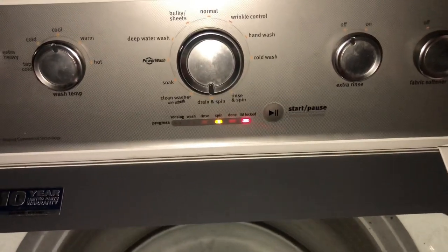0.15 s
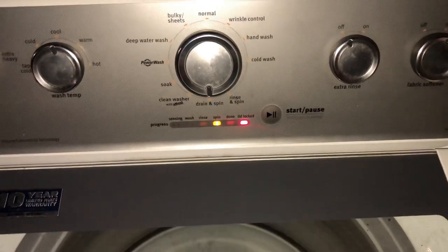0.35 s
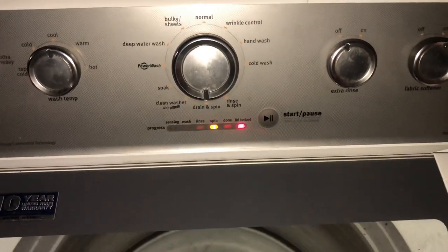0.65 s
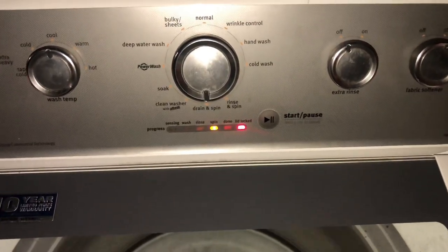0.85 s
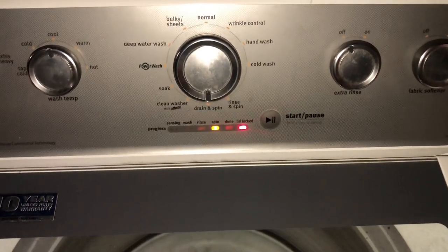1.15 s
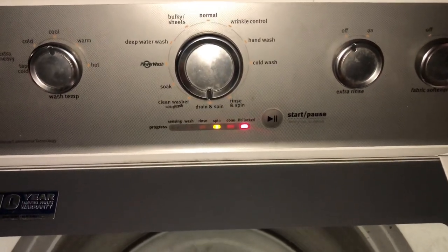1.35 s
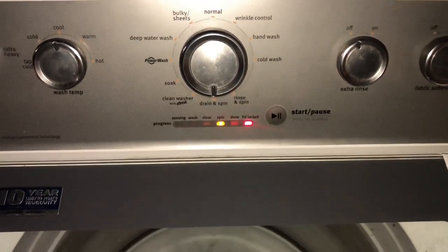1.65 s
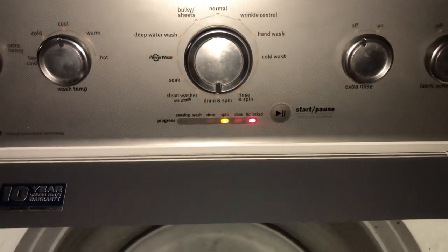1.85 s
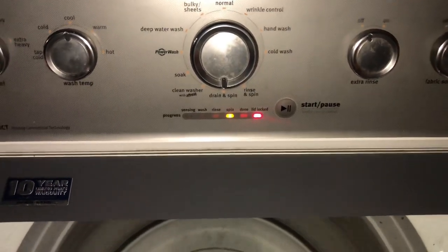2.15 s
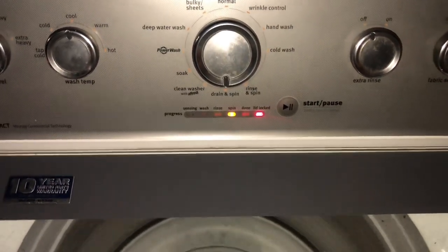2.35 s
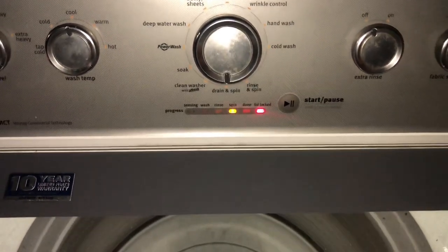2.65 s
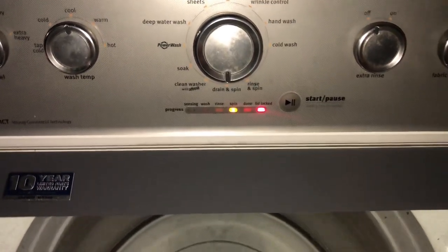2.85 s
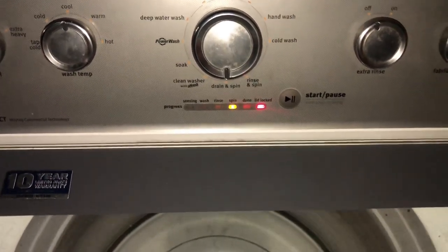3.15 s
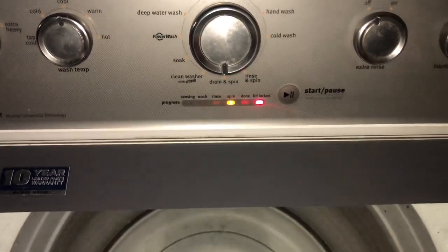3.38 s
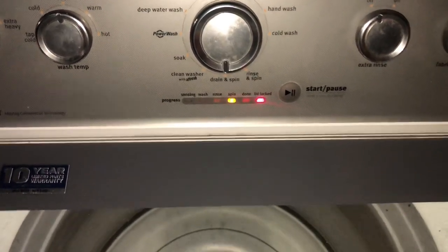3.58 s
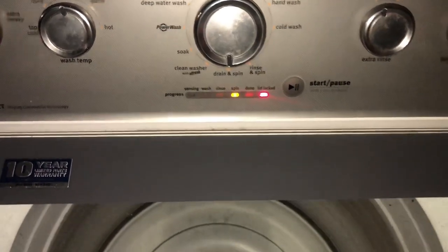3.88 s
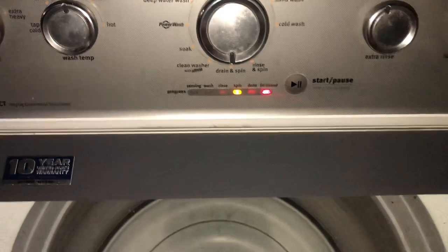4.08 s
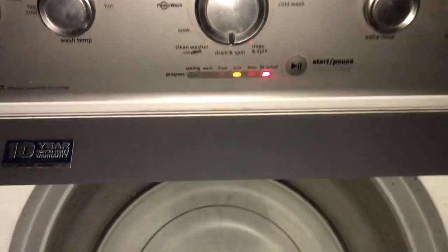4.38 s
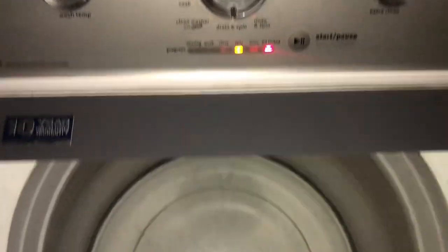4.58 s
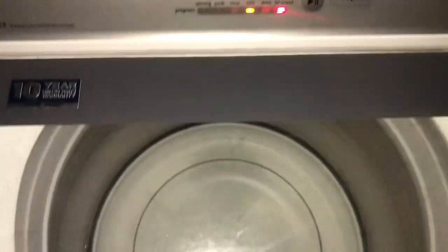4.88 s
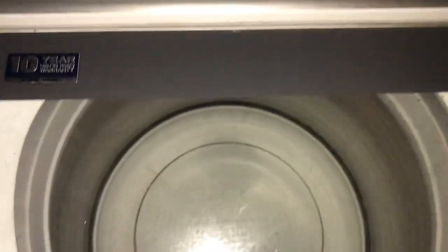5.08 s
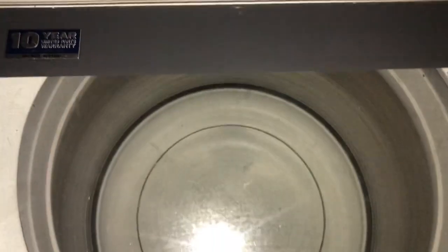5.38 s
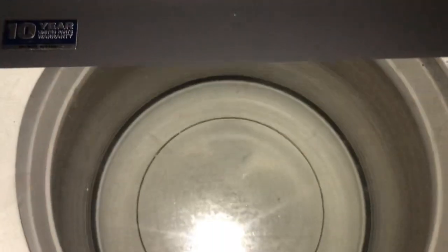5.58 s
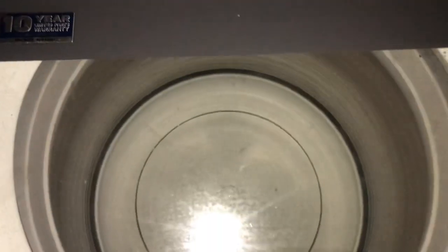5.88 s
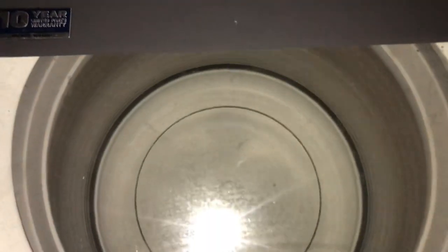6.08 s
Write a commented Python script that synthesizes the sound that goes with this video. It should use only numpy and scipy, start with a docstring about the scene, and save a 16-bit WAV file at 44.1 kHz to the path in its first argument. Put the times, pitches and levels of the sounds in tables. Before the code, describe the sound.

An empty top-load washer basket spins fast, motor humming and whining over a low roar while a metallic clack repeats about eight times a second.

```python
"""A top-load washing machine spins its empty basket at about eight turns a second, heard from above the open lid.
Mains hum and a rotor whine that follows the speed run throughout; the motor pulls hard for the first second,
with a thin sizzle. The tub drones in tones tied to the speed, and churned air roars and hisses. The basket
clacks once a turn and at first knocks on the far side too. The speed overshoots and settles; a few faint ticks
are heard. The far knock returns near 2.2 s, brushing joins from 2.75 s and wears off, faint knocks recur near 5.3 s."""
import sys
import numpy as np
from scipy.fft import rfft, irfft, next_fast_len
from scipy.io import wavfile
from scipy.ndimage import map_coordinates

SR = 44100
rng = np.random.default_rng(int(sys.argv[2]) if len(sys.argv) > 2 else 0)


def waveform_to_disk(signal):
    """Save audio, clipped to [-1, 1], as 16-bit WAV at the path in sys.argv[1]."""
    frames = np.transpose(np.atleast_2d(signal))
    scaled = np.clip(frames, -1, 1) * 32767
    samples = np.round(scaled).astype(np.int16)
    wavfile.write(sys.argv[1], SR, samples)


N = 274743
MAINS_HZ = 60


def amp(db):
    """Decibels to gain."""
    return 10 ** (np.asarray(db) / 20)


def unit(x):
    """x scaled to rms 1."""
    return x / np.sqrt(np.mean(x ** 2) + 1e-20)


def clock():
    """Time of each sample in seconds."""
    return np.arange(N) / SR


def curves(rows):
    """Each column after start_s, interpolated to one value per sample."""
    start_s, *columns = np.transpose(rows)
    return [np.interp(clock(), start_s, column) for column in columns]


def wobble(knots_per_s):
    """A smooth random curve through normally distributed knots."""
    knots = rng.standard_normal(int(N * knots_per_s / SR) + 4)
    return map_coordinates(knots, [clock() * knots_per_s])


def filtered(x, response):
    """x times a complex response of frequency, padded so that ringing does not wrap round."""
    size = next_fast_len(N + SR // 2)
    spectrum = rfft(x, size) * response(np.fft.rfftfreq(size, 1 / SR))
    return irfft(spectrum, size)[:N]


def colour(points):
    """Response through (pitch_hz, level_db) points on a log frequency axis."""
    pitch_hz, level_db = np.transpose(points)
    return lambda hz: amp(np.interp(np.log(hz + 1), np.log(pitch_hz), level_db))


def resonant(modes):
    """Causal response of parallel (pitch_hz, width_hz, level_db) resonances."""
    def response(hz):
        return sum(amp(level_db) * 1j * hz * width_hz / (pitch_hz * pitch_hz - hz * hz + 1j * hz * width_hz)
                   for pitch_hz, width_hz, level_db in modes)
    return response


def noise(response):
    """Noise of rms 1 with the given response."""
    return unit(filtered(rng.standard_normal(N), response))


def tone(cycles):
    """A sinusoid of rms 1 along a running count of cycles."""
    return np.sqrt(2) * np.cos(2 * np.pi * cycles)


SPIN_HZ, HUNT_HZ, HUNT_PERIOD_S, SETTLE_S, AT_SPEED_S = 8.3775, .484, 5.1, 1.3, .9315


def basket_speed():
    """Turns a second: swings past the set speed and settles like a damped spring."""
    t = clock()
    swing = np.sin(2 * np.pi * (t - AT_SPEED_S) / HUNT_PERIOD_S)
    return SPIN_HZ + HUNT_HZ * np.exp(-t / SETTLE_S) * swing


FIRST_CLACK_S = .0777


def basket_angle():
    """Turns of the basket: the integral of its speed, whole at the point that clacks."""
    turns = np.cumsum(basket_speed()) / SR
    return turns - np.interp(FIRST_CLACK_S, clock(), turns)


def passes(angle, turns):
    """Times in seconds at which the basket passes one point of its round."""
    first = turns + np.ceil(angle[0] - turns)
    return np.interp(np.arange(first, angle[-1]), angle, clock())


EASE_AT_S, EASE_S = 1, 0.21


def by_effort(settled, pulling):
    """Moves smoothly from pulling to settled as the motor eases off."""
    return settled + (pulling - settled) / (1 + np.exp((clock() - EASE_AT_S) / EASE_S))


# Strong hum: start_s, level_120hz_db, level_240hz_db, level_360hz_db
HUM_LEVELS = [(0, -40.5, -37.5, -35.5), (0.55, -39, -34, -44), (1.0, -40, -43.5, -35),
              (1.45, -39.5, -37.5, -38), (2.1, -39.5, -37, -46), (2.6, -40.3, -38, -43.5),
              (3.4, -41, -37, -43.5), (4.1, -42, -40, -40.5), (5.1, -40, -38, -37.5),
              (5.5, -40, -40, -37.5), (6.2, -40, -37, -39.5)]
# Throb of each strong hum tone: settled_db, pull_db, lag_turns, side (+1 beats from above, -1 from below)
HUM_THROB = [(-59, -42, 0.013, 1), (-51.5, -48, 0.67, -1), (-52, -58, 0.12, -1)]
# Weaker hum tones: mains_multiple, level_db
WEAK_HUM = [(3, -59), (8, -53.5), (10, -52.5), (12, -52), (14, -53), (16, -67), (18, -89)]
SLIP_HZ = .09  # the tub's swing slowly falls behind the basket


def motor(angle):
    """Magnetic hum, mostly at even mains multiples; its strong tones throb as the basket swings round."""
    mains = MAINS_HZ * clock()
    swing = angle - SLIP_HZ * clock()
    out = np.zeros(N)
    for k, (level_db, throb_row) in enumerate(zip(curves(HUM_LEVELS), HUM_THROB), 1):
        settled_db, pull_db, lag_turns, side = throb_row
        delay_cycles = .05 * k * k  # the bending panels pass each tone with its own delay
        cycles = 2 * k * mains - delay_cycles + 0.018 * wobble(4.94)
        # the basket's share is shifted by one cycle per turn of the swing and beats with the rest
        throb = amp(by_effort(settled_db, pull_db)) * tone(cycles + np.sign(side) * (swing - lag_turns))
        steady = amp(level_db + 0.37 * wobble(5.1)) * tone(cycles)
        out -= steady + throb
    for mains_multiple, level_db in WEAK_HUM:
        gain = amp(level_db + wobble(1.76))
        out -= gain * tone(mains_multiple * mains + rng.random() + 0.12 * wobble(1.334))
    return out


# Whine lines either side of the slot rate: mains_multiple_added, level_db (relative)
WHINE_SIDEBANDS = [(-2, 2), (0, 2), (2, -1.5), (4, -2), (6, -9)]
# Cabinet resonances: pitch_hz, width_hz, level_db (relative)
CABINET_MODES = [(519, 5.2, 4), (624, 8.8, -11), (627, 13, -1.5), (870, 33, 2), (980, 8.3, 0)]
SLOTS_PER_TURN = 77  # rotor slot cycles per basket turn
WHINE_DB, WHINE_PULL_DB = -53, -47


def whine():
    """Rotor slots sing in lines that follow the speed and swell as they cross cabinet resonances."""
    slot_hz = SLOTS_PER_TURN * basket_speed()
    whine_db = by_effort(WHINE_DB, WHINE_PULL_DB)
    out = np.zeros(N)
    for mains_multiple, level_db in WHINE_SIDEBANDS:
        line_hz = slot_hz + mains_multiple * MAINS_HZ
        cabinet_gain = 0.29 + 0.72 * np.abs(resonant(CABINET_MODES)(line_hz))
        gain = amp(whine_db + level_db + wobble(4.5)) * cabinet_gain
        out += gain * tone(np.cumsum(line_hz) / SR + rng.random() + 0.036 * wobble(12))
    return out


# Drone levels: start_s, sway_db, walls_db
DRONE_LEVELS = [(0, -55, -50), (.8, -47, -58), (1.25, -57, -55), (1.75, -57, -55), (2.1, -46.5, -55),
                (2.6, -52, -51), (3.2, -46, -47), (4.2, -50.5, -48.5), (6.2, -55, -51)]
# Deep sway of the tub: cycles_per_turn, level_db (relative)
SWAY_ORDERS = [(4.9, -26), (6.88, -6), (7.9, -10), (8.85, -4)]
# Higher drumming of the tub walls: cycles_per_turn, level_db (relative)
WALL_ORDERS = [(9.9, -12), (10.8, -8.5), (16.3, -5.5), (18.7, -12), (20.7, -5.5), (22.7, -13)]


def tub(angle):
    """The drive shakes the tub in low, unsteady tones that follow the speed."""
    out = np.zeros(N)
    for drone_db, orders in zip(curves(DRONE_LEVELS), (SWAY_ORDERS, WALL_ORDERS)):
        for cycles_per_turn, level_db in orders:
            waver_db = 1.2 * wobble(1.6)
            drift_cycles = .08 * wobble(2)
            cycles = cycles_per_turn * angle + rng.random() + drift_cycles
            out += amp(drone_db + level_db + waver_db) * tone(cycles)
    return out


# Level of the roar: start_s, level_db
ROAR_LEVELS = [(0, -41.5), (1.05, -39.5), (2.3, -42.5), (4, -41), (5.2, -40.5), (6.2, -41)]
# Spectrum of the low roar: pitch_hz, level_db (per Hz, relative)
ROAR_COLOUR = [(25, -30), (48, -13.5), (70, -16), (100, -5), (135, -1.5), (180, -5.5), (225, 3), (320, 0.5),
               (420, -4), (600, -4), (780, -10), (1050, -12.5), (1400, -18.5), (2600, -58.5)]
# Spectrum of the hiss: pitch_hz, level_db (per Hz, relative)
HISS_COLOUR = [(800, -40), (1400, 9), (2000, 10.5), (2400, 4), (2850, -5), (3400, -2.5), (4500, -5.5),
               (6000, -6), (8300, -10), (11000, -15.5), (13000, -18), (15500, -22)]
HISS_DB = -57


def air():
    """The spinning basket churns air and rumbles through the cabinet; a fine hiss lies on top."""
    roar_db, = curves(ROAR_LEVELS)
    roar = noise(colour(ROAR_COLOUR)) + amp(-11.5) * noise(resonant(CABINET_MODES))
    roar *= amp(roar_db + 0.17 * wobble(22.5))
    hiss_level_db = HISS_DB + .9 * wobble(40)
    hiss = amp(hiss_level_db) * noise(colour(HISS_COLOUR))
    return roar + hiss


SIZZLE_DB = -73


def sizzle():
    """A narrow band of friction noise that fades as the motor eases off."""
    ring = resonant([(7200, 650, 0)])
    gain = by_effort(0, amp(SIZZLE_DB)) * amp(1.6 * wobble(28.5))
    return gain * noise(lambda hz: ring(hz) ** 2)


def burst(start_s, t60_s, attack_s=0.0012):
    """An envelope that rises at start_s and decays by 60 dB in t60_s."""
    t = np.arange(SR // 4) / SR
    shape = (1 - np.exp(-t / attack_s)) * amp(-60 * t / t60_s)
    return np.pad(shape, (max(round(start_s * SR), 0), N))[:N]


def chatter(count):
    """Random signs: a dense, flat excitation."""
    return np.sign(rng.standard_normal(count))


# Basket modes: pitch_hz, width_hz, level_db (relative)
BASKET_MODES = [(1856, 96, 8), (2186, 220, 3.5), (2440, 60, 2.5), (2726, 47, -3), (3156, 250, -2),
                (3387, 59, -0.5), (3780, 110, -4), (4140, 160, -4.5), (4730, 130, -10.5), (5640, 1400, -10),
                (6760, 280, -8), (7290, 330, -8), (8060, 780, -3.5), (9000, 590, -12.5), (10000, 820, -15),
                (12700, 1600, -10)]


def rattle(starts_s, levels_db, contact, t60_s, crack_db=-1, crack_t60_s=0.0078):
    """A short crack, then the basket's dense modes answer, partly alike from strike to strike, and the tub rings."""
    t = np.arange(SR // 6) / SR
    crack = amp(crack_db - 60 * t / crack_t60_s)
    basket_ring = amp(-60 * t / t60_s)
    tub_ring = amp(-17.5) * amp(-60 * t / 0.39)
    envelope = (1 - np.exp(-t / 0.0012)) * (crack + basket_ring + tub_ring)
    common = chatter(len(t))
    out = np.zeros(N + SR)
    for start_s, level_db in zip(starts_s, levels_db):
        scatter = .9 * chatter(len(t))  # drawn afresh for each contact
        first = max(round(start_s * SR), 0)
        out[first:first + len(t)] += amp(level_db) * envelope * (common + scatter)

    def body(hz):
        return resonant(BASKET_MODES)(hz) * colour(contact)(hz)
    return filtered(out[:N], body) / np.std(filtered(chatter(N), body))


# Force of the clack: start_s, level_db
CLACK_LEVELS = [(0, -53.5), (1.6, -52), (1.9, -50), (2.3, -51), (2.7, -52), (4.8, -52), (6.2, -52)]
# Spectrum of the clack contact: pitch_hz, level_db (relative)
CLACK_CONTACT = [(900, -6), (1800, 0.5), (2300, 2), (3100, 5.5), (4300, 2.5), (6000, -2), (8300, 0),
                 (11000, -11), (16000, -17)]
# Force of the far-side knock: start_s, level_db
FAR_KNOCK_LEVELS = [(0, -47.5), (.9, -49), (1.15, -56), (2.06, -57), (2.18, -49), (2.43, -52), (3, -64),
                    (5.05, -71), (5.33, -57), (6.2, -70)]
# Spectrum of the knock contact: pitch_hz, level_db (relative)
KNOCK_CONTACT = [(900, -11), (1850, 8), (2800, 3), (4200, 8.5), (6000, 9), (8300, -6.5), (11000, -8),
                 (16000, -21)]
CLACK_SCATTER_DB = 0.63
SNAP_DB, SNAP_PULL_DB = -22, -7  # relative to the clack
FAR_SIDE_TURNS = .587
# brushing leads each clack; level relative to the clack
BRUSH_FROM_S, BRUSH_LEAD_S, BRUSH_DB, BRUSH_FADE_DB_PER_S = 2.75, .009, -2, 5.5


def strikes(angle):
    """Each turn the basket clacks with a crisp snap, later brushing first, and knocks past half a turn on."""
    clack_s = passes(angle, 0)
    clack_db = np.interp(clack_s, *np.transpose(CLACK_LEVELS))
    clack_db += CLACK_SCATTER_DB * rng.standard_normal(len(clack_s))
    clacks = rattle(clack_s, clack_db, CLACK_CONTACT, t60_s=0.092)

    snaps = sum(amp(level_db) * burst(start_s, t60_s=0.065) for start_s, level_db in zip(clack_s, clack_db))
    snaps = snaps * amp(by_effort(SNAP_DB, SNAP_PULL_DB))
    contact = resonant([(11000, 7200, 0)])  # the contact itself is bright and has no pitch
    snaps = snaps * noise(lambda hz: contact(hz) ** 2)

    far_s = passes(angle, FAR_SIDE_TURNS)
    far_db = np.interp(far_s, *np.transpose(FAR_KNOCK_LEVELS))
    knocks = rattle(far_s, far_db, KNOCK_CONTACT, t60_s=0.064)

    brushing = clack_s > BRUSH_FROM_S
    brush_db = clack_db + BRUSH_DB - BRUSH_FADE_DB_PER_S * (clack_s - BRUSH_FROM_S)
    brushes = rattle(clack_s[brushing] - BRUSH_LEAD_S, brush_db[brushing], CLACK_CONTACT, t60_s=0.07)
    return clacks + snaps + knocks + brushes


# Stray ticks: start_s, level_db (before the envelope), pitch_hz, width_hz (of one resonance pass), t60_s
STRAY_TICKS = [(1.772, -64, 14000, 4000, .08), (2.325, -64, 13000, 5000, .12),
               (2.386, -48, 13500, 5000, .02), (5.169, -54, 5700, 898, 0.093)]


def ticks():
    """A few faint, high ticks: short bursts of noise through a twice-applied resonance."""
    out = np.zeros(N)
    for start_s, level_db, pitch_hz, width_hz, t60_s in STRAY_TICKS:
        ring = resonant([(pitch_hz, width_hz, 0)])
        out += amp(level_db) * burst(start_s, t60_s) * noise(lambda hz: ring(hz) ** 2)
    return out


def scene():
    """All the parts of the machine summed at one microphone."""
    angle = basket_angle()
    steady = motor(angle) + whine() + tub(angle) + air() + sizzle()
    return (steady + strikes(angle) + ticks())[None]


TOP_HZ = 15780


def record(dry):
    """The microphone channel passes nothing above its band limit."""
    return np.array([filtered(channel, lambda hz: hz < TOP_HZ) for channel in dry])


dry = scene()
out = record(dry)
waveform_to_disk(out)
```